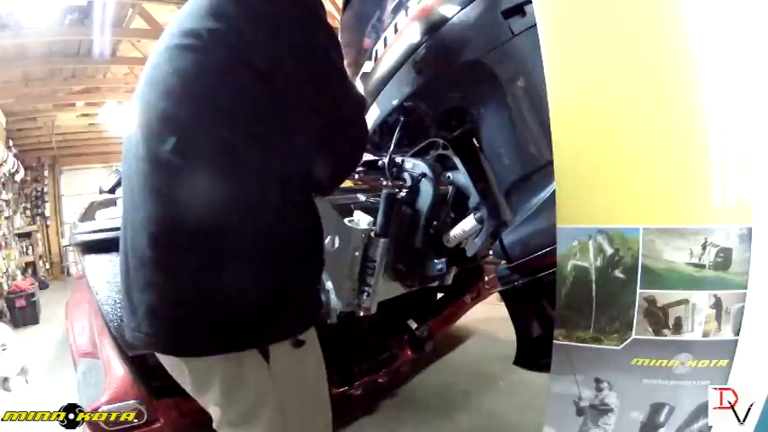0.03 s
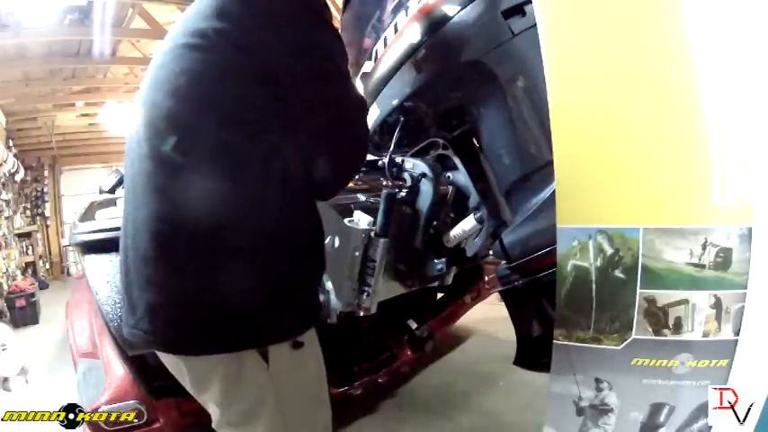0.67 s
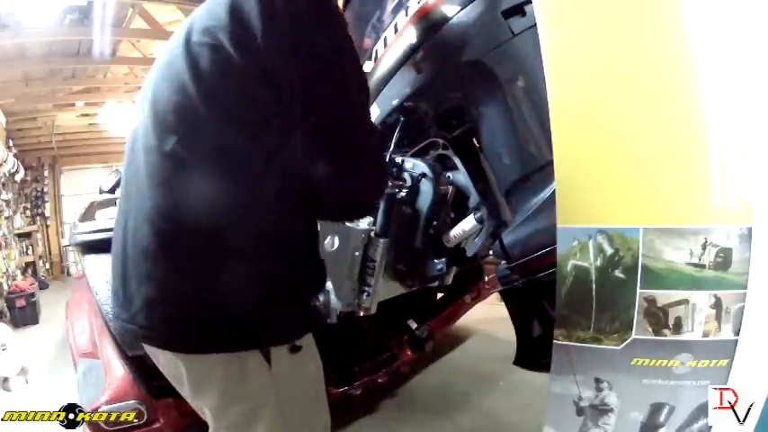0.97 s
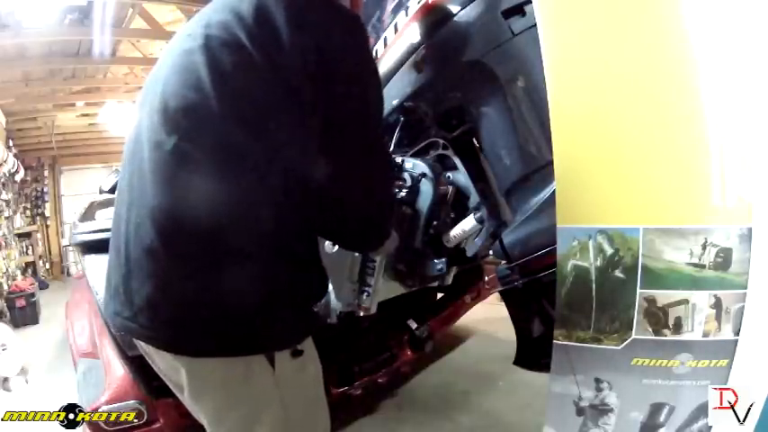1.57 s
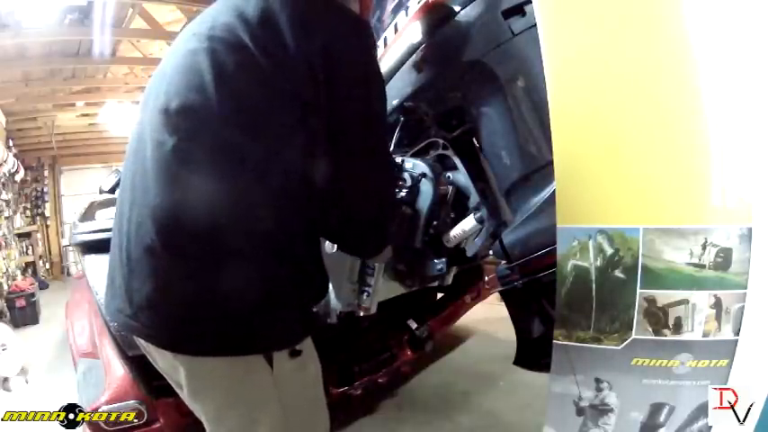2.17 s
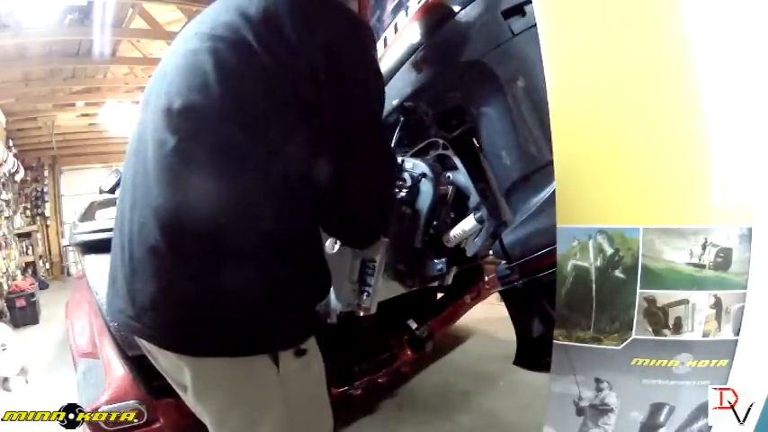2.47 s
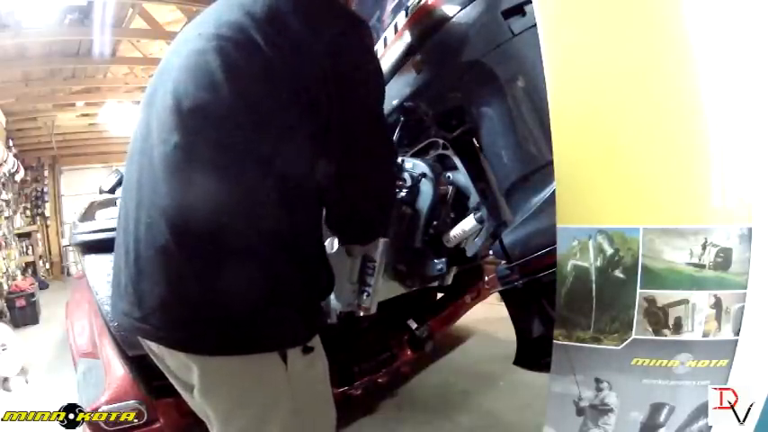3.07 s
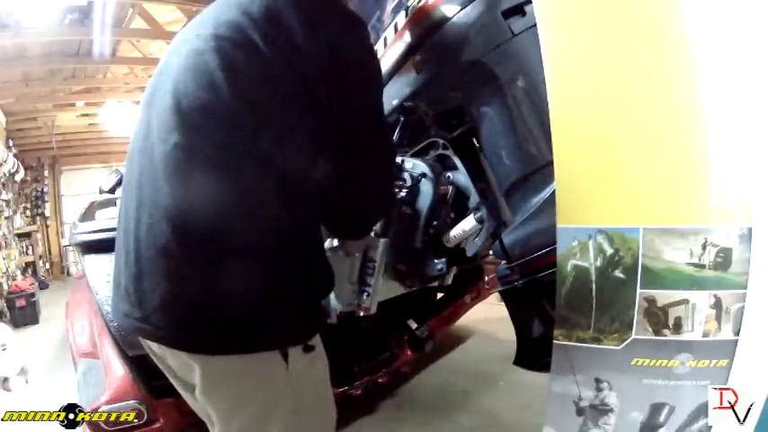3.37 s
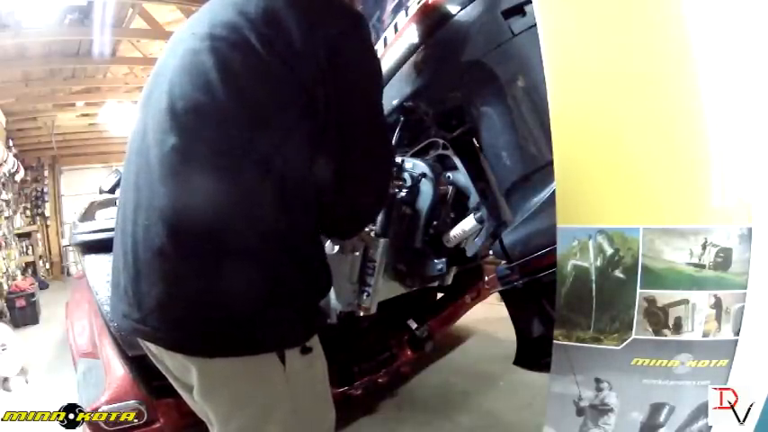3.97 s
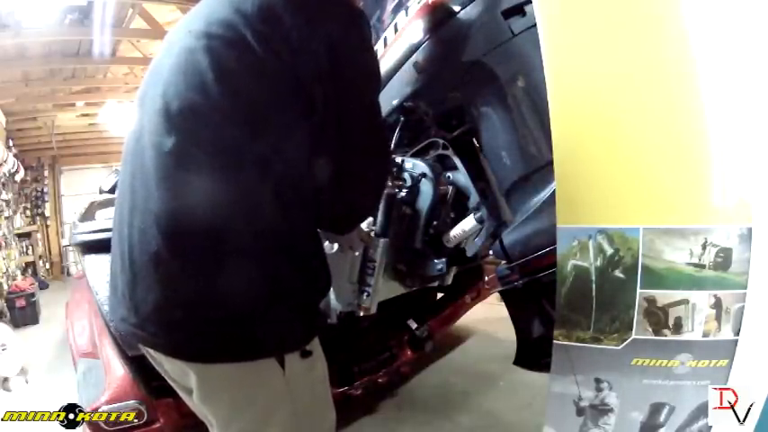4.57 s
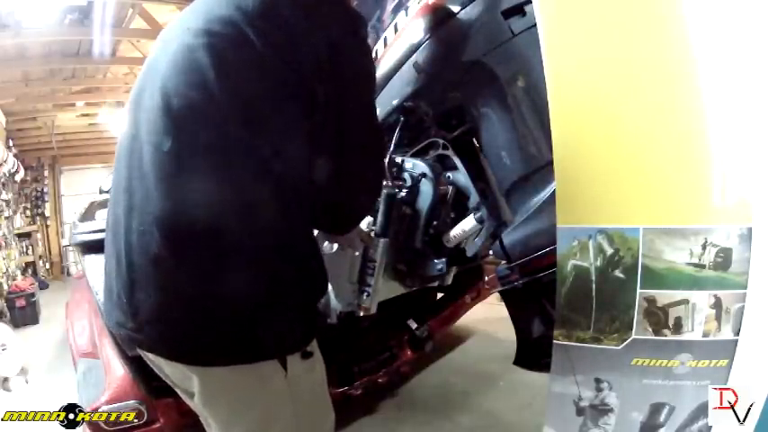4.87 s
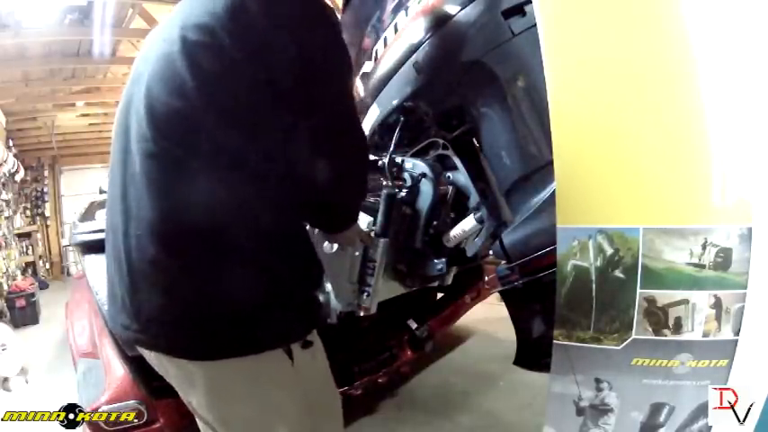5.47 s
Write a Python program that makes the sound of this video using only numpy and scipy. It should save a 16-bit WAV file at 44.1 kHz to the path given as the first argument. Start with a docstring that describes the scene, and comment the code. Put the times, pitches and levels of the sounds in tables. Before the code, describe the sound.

In a quiet garage, a washer rasps faintly along a bolt and a hand bumps a motor housing. Steel bolts then knock, chatter and briefly squeak against a ringing bracket, growing busier before the washer snaps against the bolt head with one bright clang. Several dull bumps follow, and a sleeve rustles near the end. The sounds are fairly close, with a short room echo.

```python
"""Steel hardware is worked into place on a motor bracket in a garage, over quiet room noise.
First a washer rasps along a bolt and hands bump the housing. From 1.3 s bolts knock, chatter
and squeal in stick-slip against the ringing bracket. At 3.1 s the washer snaps against the
bolt head with one bright clang. More dull bumps follow, and a sleeve rustles near the end."""
import sys
import numpy as np
from scipy import signal
from scipy.fft import rfft, irfft
from scipy.io import wavfile
from scipy.ndimage import uniform_filter1d

SR = 44100
rng = np.random.default_rng(int(sys.argv[2]) if len(sys.argv) > 2 else 0)


def transcribe(signal):
    """Save signal, clipped to [-1, 1], as a 16-bit WAV file at the path in sys.argv[1]."""
    frames = np.atleast_2d(signal).T
    limited = np.clip(frames, -1, 1)
    pcm = np.round(limited * 32767).astype(np.int16)
    wavfile.write(sys.argv[1], SR, pcm)


N = 243873

# Bolt-on-bracket contacts. Each row: start in seconds, chatter length in seconds, strength in dB,
# hardness (treble over middle) in dB, grip (favours bolt ring over bracket ring) in dB.
CONTACTS = [(1.2941, 0.0097, -28, 0.5, 6), (1.305, 0.02, -37, -6, 3), (1.479, 0.075, -50, -14, 22),
            (1.558, .051, -47.5, -15, 14), (1.733, 0.037, -51, -34, 41), (1.7616, 0.02, -37, -8, 6.5),
            (1.913, 0.051, -47.5, -8.5, 16), (1.98, 0.008, -32, .5, 6), (2.0031, 0.0049, -31, 8, 14),
            (2.021, .016, -25.5, 0, 2), (2.042, 0.012, -28, 1.5, 17), (2.068, 0.012, -36.5, 2, 5),
            (2.1982, 0.006, -31.5, -3, 7), (2.22, 0.018, -32, 2, -4), (2.244, 0.055, -28, 2.5, 3),
            (2.328, 0.017, -23, -4.5, -1.5), (2.356, 0.0051, -21.5, 3, 9), (2.366, 0.0044, -29.5, 14, 14.5),
            (2.4345, 0.0049, -26, -15.5, 16), (2.588, 0.0079, -32, -1.5, 7.5),
            (2.706, 0.034, -44.5, -16, 8), (2.809, 0.046, -51, -3, 5), (2.922, 0.021, -48.5, 2, 1),
            (2.959, 0.025, -25, -2.5, -6), (2.993, 0.021, -38.5, 17, 0.5), (3.014, 0.002, -36.5, 10, 2.5),
            (3.108, 0.0055, -26, 10, -5.5), (3.13, .002, -41.5, 22.5, -9.5)]
# Split modes of the washer. Each row: frequency in Hz, relative level in dB, t60 in seconds.
WASHER_MODES = [(3680, 0, .22), (3745, -1, .22), (8285, -5, .2), (8350, -6, .2)]


def amp(db):
    """Decibels to gain."""
    return 10 ** (np.asarray(db) / 20)


def unit(x):
    """Scale to energy 1."""
    return x / np.sqrt(np.sum(x ** 2) + 1e-20)


def at_level(x, db):
    """Scale so that the loudest 10 ms has an rms of db."""
    return amp(db) * x / np.sqrt(uniform_filter1d(x ** 2, SR // 100).max() + 1e-20)


def onset(n, rise_s):
    """Exponential rise towards 1, n samples long."""
    return 1 - np.exp(-np.arange(n) / SR / rise_s)


def curve_at(points, hz):
    """Interpolate (Hz, value) points on a log-frequency axis."""
    points_hz, values = np.transpose(points)
    return np.interp(np.log(hz + 1), np.log(points_hz), values)


def add(mix, start_s, sound):
    """Mix a sound in at start_s."""
    part = mix[max(round(start_s * SR), 0):][:len(sound)]
    part += sound[:len(part)]


def colour(x, spectrum):
    """Minimum-phase filter through (Hz, dB) points."""
    size = 2048
    gain = amp(curve_at(spectrum, np.fft.rfftfreq(size, 1 / SR)))
    cepstrum = irfft(np.log(gain))
    cepstrum[1:size // 2] *= 2
    cepstrum[size // 2 + 1:] = 0
    return signal.fftconvolve(x, irfft(np.exp(rfft(cepstrum))))[:len(x)]


def hiss(spectrum):
    """Coloured noise, rms 1."""
    return unit(colour(rng.standard_normal(N), spectrum)) * np.sqrt(N)


def wander(n, smooth_samples):
    """Smoothed noise, rms 1."""
    return unit(uniform_filter1d(rng.standard_normal(n), smooth_samples)) * np.sqrt(n)


def ring(modes):
    """Decaying (Hz, dB, t60 s) modes in random phase, energy 1."""
    out = np.zeros(SR * 3 // 4)
    for hz, db, t60_s in modes:
        t = np.arange(min(int(t60_s * SR), len(out))) / SR
        out[:len(t)] += amp(db - 60 * t / t60_s) * np.sin(2 * np.pi * (hz * t + rng.random()))
    return unit(out)


def struck(pitches_hz, decays, place_db=-0.5, split_hz=14, twin_db=-6):
    """Struck steel: each place of contact favours other modes, and each mode beats with a twin."""
    places, splits = rng.standard_normal((2, len(pitches_hz)))
    modes = [(hz, db + place_db * place, t60_s)
             for hz, (db, t60_s), place in zip(pitches_hz, decays, places)]
    twins = [(hz + split_hz * split, db + twin_db, t60_s)
             for (hz, db, t60_s), split in zip(modes, splits)]
    return ring(modes + twins)


def strokes(rows, attack_share, release_s, slope_db_per_s=0):
    """Gain of rubbing strokes: each swells over a share of its length, runs on, then dies away."""
    out, t = np.zeros(N), np.arange(SR) / SR
    for start_s, length_s, db in rows:
        swell = np.minimum(t / (attack_share * length_s), 1)
        release = np.exp(-np.maximum(t - length_s, 0) / release_s)
        add(out, start_s, amp(db + slope_db_per_s * t) * swell * release)
    return out


def garage(direct_db, near_db, near_s):
    """Room response: direct sound, quick scatter off the machine, and a tail; dB relative to the tail."""
    # Each row: frequency in Hz, reverberation t60 in seconds.
    reverb_times = [(100, 0.98), (400, 0.45), (1000, 0.46), (2800, 0.34), (7300, 0.35), (15000, 0.42)]
    t = np.arange(SR * 3 // 4) / SR
    hz, frame_s, spectra = signal.stft(rng.standard_normal(len(t)), SR, nperseg=256)
    decay = amp(-60 * frame_s / curve_at(reverb_times, hz)[:, None])
    tail = signal.istft(spectra * decay, SR, nperseg=256)[1][:len(t)]
    tail *= onset(len(t), rise_s=0.0016)
    near = rng.standard_normal(len(t)) * np.exp(-t / near_s)
    return unit(amp(direct_db) * (t == 0) + amp(near_db) * unit(near) + unit(tail))


def room_noise(noise_db=-57, whine_db=-73.5):
    """Quiet steady noise with a few faint whines."""
    # Each row: frequency in Hz, relative level in dB.
    noise_spectrum = [(25, -5), (86, -3.5), (156, -7), (240, -1.5), (400, -8.5), (540, -12), (700, -17.5),
                      (1800, -24), (3300, -25), (4200, -24.5), (5400, -27), (6050, -39), (6500, -33),
                      (7900, -28), (10000, -36.5), (15000, -38)]
    # Each row: frequency in Hz, relative level in dB, t60 in seconds.
    whine_modes = [(1370, -3.5, 0.15), (2750, -2, .04), (4136, 0.5, 0.039), (6620, -16, 0.024),
                   (7900, -8.5, .015)]
    whine = signal.fftconvolve(rng.standard_normal(N), ring(whine_modes))[:N]
    return amp(noise_db) * hiss(noise_spectrum) + amp(whine_db) * whine


def sleeve(rustle_db=-4, grain_db=1.6):
    """Fibres catch in tiny grains as the arm speeds up, while the loose cloth flaps."""
    # Each row: start in seconds, length in seconds, relative level in dB.
    brushes = [(4.895, 0.2, -47), (5.395, 0.024, -53)]
    # Each row of both: frequency in Hz, relative level in dB.
    rustle_spectrum = [(500, -9), (1200, -8), (2600, -3), (3400, -5), (4100, -2), (6000, -14), (7900, -7.5),
                       (10500, -21.5), (13200, -29), (14900, -20)]
    flap_spectrum = [(25, -8), (70, 15), (130, -13), (300, -20.5), (700, -45)]
    grains = wander(N, smooth_samples=120)
    rub = strokes(brushes, attack_share=0.16, release_s=0.019, slope_db_per_s=20)
    rustle = rub * hiss(rustle_spectrum) * amp(grain_db * grains + rustle_db)
    # Only the long stroke swings the cloth, most at its start.
    swing = strokes(brushes[:1], attack_share=0.12, release_s=0.091, slope_db_per_s=-38)
    return rustle + swing * hiss(flap_spectrum)


def washer_slides(ring_db=-3, rasp_db=-3):
    """A washer is pushed along a bolt: friction rasps and rings its split modes, which beat."""
    # Each row: start in seconds, length in seconds, relative level in dB.
    slides = [(.415, 0.094, -47.5), (.552, .025, -45)]
    # Each row: frequency in Hz, relative level in dB.
    rasp_spectrum = [(800, -23), (2800, -16), (3700, -3), (4700, -10), (6000, -20.5), (8300, -11),
                     (9800, -36), (15000, -34.5)]
    push = strokes(slides, attack_share=0.35, release_s=0.013)
    tone = signal.fftconvolve(push * rng.standard_normal(N), ring(WASHER_MODES))[:N]
    friction = push * hiss(rasp_spectrum)
    rasp = signal.fftconvolve(friction, garage(direct_db=0, near_db=1, near_s=0.0051))[:N]
    return amp(ring_db) * tone + amp(rasp_db) * rasp


def housing_bumps(trim_db=-5, note_t60_s=0.11, rebound_s=0.03, rebound_db=-9):
    """Padded blows of a hand: a thud, a brief hollow note and the boom of the whole mass."""
    # Each row: start in seconds, relative level in dB, hollow note in Hz.
    bumps = [(1.053, -42, 418), (1.108, -35.5, 517.5), (1.596, -40.5, 450), (2.338, -32.5, 100.6),
             (3.111, -28.5, 250), (3.478, -45.5, 208), (3.586, -40.5, 397), (3.658, -43, 219),
             (3.8, -44.5, 258), (3.827, -37.5, 277.6), (4.605, -26.5, 517), (4.753, -31.5, 531),
             (4.839, -35, 513), (4.882, -27.5, 430), (5.519, -29, 324.5)]
    # Each row of both: frequency in Hz, relative level in dB.
    thud_spectrum = [(40, -14), (150, -6), (300, 3), (550, -4.5), (720, -13.5), (1400, -21.5), (2000, -31),
                     (2600, -27.5), (5000, -33.5), (10500, -40.5), (12300, -21), (14000, -48.5)]
    boom_spectrum = [(25, -22), (65, 2.5), (105, 9), (150, -7), (230, 5), (400, -10.5), (1000, -37)]
    out = np.zeros(N)
    for start_s, db, note_hz in bumps:
        boom_db = -6 - 12 * np.log2(note_hz / 310)  # the lower the note, the more the mass moves
        for delay_s, softer_db in (0, 0), (rebound_s, rebound_db):  # the hand settles once
            room = garage(direct_db=-9, near_db=-0.5, near_s=0.017)
            thud = unit(colour(room, thud_spectrum))
            note = unit(colour(ring([(note_hz, 0, note_t60_s)]), thud_spectrum))
            boom = amp(boom_db) * unit(colour(room, boom_spectrum))
            sound = (thud + note + boom) * onset(len(room), rise_s=0.0014)
            add(out, start_s + delay_s, at_level(sound, db + trim_db + softer_db))
    return out


def squeals(waver_share=0.0034):
    """Steel sticks and slips, locking on to one resonance in a short wavering tone."""
    # Each row: start in seconds, length in seconds, pitch in Hz, level in dB, glide as a share of pitch.
    tones = [(1.303, 0.028, 4740, -33.5, 0), (1.304, 0.023, 7240, -37, 0), (1.549, 0.057, 2560, -52.5, 0),
             (1.757, 0.1, 4020, -51.5, 0.014), (1.922, 0.027, 4190, -52.5, 0),
             (2.291, 0.04, 2580, -29.5, 0.027), (2.32, 0.042, 2030, -33.5, -0.33),
             (2.358, 0.012, 4210, -30.5, 0), (2.927, 0.018, 4870, -48.5, 0),
             (3.073, 0.039, 1600, -42.5, 0.14)]
    out = np.zeros(N)
    for start_s, length_s, hz, db, glide in tones:
        n = int(length_s * SR)
        drift = wander(SR, smooth_samples=90)[:n]
        pitch_hz = hz * (1 + waver_share * drift + glide * np.linspace(-0.5, 0.5, n))
        tone = np.sin(2 * np.pi * np.cumsum(pitch_hz) / SR) * signal.windows.tukey(n, 0.5)
        sound = signal.fftconvolve(tone, garage(direct_db=29, near_db=-8, near_s=0.0067))
        add(out, start_s, at_level(sound, db))
    return out


def washer_snaps(washer_db=-12):
    """The loose washer snaps against the bolt head, which pings and chokes; the washer rings on."""
    # Each row: start in seconds, level in dB.
    snaps = [(1.762, -67), (3.018, -32.5), (3.1093, -14)]
    # Each row: frequency in Hz, relative level in dB, t60 in seconds.
    head_modes = [(3950, -1, 0.056), (4113, -2, .05), (6110, 2, 0.0392), (6600, 1, 0.035),
                  (7800, -5.5, 0.13)]
    out = np.zeros(N)
    for start_s, db in snaps:
        ping = ring(head_modes) + amp(washer_db) * ring(WASHER_MODES)
        sound = signal.fftconvolve(ping, garage(direct_db=1, near_db=0.5, near_s=0.0019))
        sound *= onset(len(sound), rise_s=0.0008)
        add(out, start_s, at_level(sound, db))
    return out


def first_blow_db(length_s, fall_db_per_s=257):
    """First blow over the chatter after it: a short knock starts sharply, a long drag creeps in."""
    return 2.5 - fall_db_per_s * length_s


def casting_clunks(trim_db=-4):
    """The first blow of each contact clunks in the heavy casting; the sharper, the louder."""
    # Each row: frequency in Hz, relative level in dB, t60 in seconds.
    casting_modes = [(450, -4.5, 0.085), (922, -5.5, 0.041), (1110, 4.5, 0.033), (1567, -12, 0.053)]
    out = np.zeros(N)
    for start_s, length_s, strength_db, _, _ in CONTACTS:
        clunk = signal.fftconvolve(ring(casting_modes), garage(direct_db=10.5, near_db=-9, near_s=0.004))
        clunk *= onset(len(clunk), rise_s=0.0006)
        add(out, start_s, at_level(clunk, strength_db + trim_db + first_blow_db(length_s)))
    return out


def chatter(length_s, count=80, gap_s=0.001, spread_db=2.5):
    """A first blow, then small irregular slips as the threads drag over an edge."""
    slip_s = (np.arange(count) + rng.random(count)) * gap_s
    kicks = rng.choice([-1, 1], count) * amp(spread_db * rng.standard_normal(count))
    gate = np.clip((length_s - slip_s) / gap_s + 1, 0, 1)
    slips = np.zeros(SR // 10)
    slips[(slip_s * SR).astype(int)] = kicks * gate
    slips = unit(slips)
    slips[0] += amp(first_blow_db(length_s))
    return slips


def registers_db(strength_db, hardness_db, usual_db=-30):
    """Bass, middle, treble, top: all grow with strength; hardness lifts the treble and thins the bass."""
    force_db = strength_db - usual_db
    bass_db = -32 + 0.84 * force_db - 0.25 * hardness_db
    top_db = -40.5 + 0.93 * force_db
    return bass_db, strength_db, strength_db + hardness_db, top_db


def bolt_contacts(bolt_db=-1, trim_db=-2.5, damping_db_per_s=45):
    """Each contact cracks and rings both the steel bracket and the finger-damped bolt."""
    # Each row: frequency in Hz, relative level in dB.
    crack_spectrum = [(40, -19), (170, -6), (300, 4), (400, 5.5), (520, 5.5), (680, -11), (820, -2),
                      (1150, 6), (1850, 1), (2750, 6), (3500, -6), (6500, -4), (9200, -12.5), (10200, -14),
                      (13000, -14.5), (14800, -16.5)]
    # Mode frequencies.
    bracket_hz = [394, 941, 1125, 1223, 1540, 2293, 2488, 2619, 2855, 3655, 3768, 4017, 4182, 4317, 4694,
                  4818, 5105, 5353, 5738, 6262, 6645, 6895, 7182, 7983, 9146, 9512, 9705, 14300, 14489,
                  14850]
    bolt_hz = [520, 937, 1250, 1552, 2640, 2800, 3100, 4140, 4780, 5770, 6228, 7220, 7850, 9380, 10450,
               13540, 14650]
    # Each row, one per mode: relative level in dB, t60 in seconds.
    bracket_decays = [(-2.5, 0.61), (-22.5, 0.26), (-12.5, 0.21), (2, 0.28), (7, 0.11), (1, 0.45),
                      (0, 0.66), (-7.5, 0.24), (-11.5, 0.25), (-13, 0.54), (-9, 0.2), (-7.5, 0.33),
                      (-7, .22), (-7, 0.22), (-13, 0.11), (-3, 0.15), (-8.5, 0.37), (-9, 0.3), (-5, 0.15),
                      (-12.5, 0.34), (-14, 0.25), (-13, 0.43), (-7, 0.16), (-5.5, 0.19), (-20.5, 0.27),
                      (-11.5, 0.38), (-11.5, .34), (-15.5, .32), (-6.5, .45), (-15, .28)]
    bolt_decays = [(-7, 0.12), (1.5, 0.063), (2.5, 0.078), (4, 0.14), (0.5, 0.079), (-15, 0.016),
                   (4, 0.014), (8.5, 0.043), (1.5, 0.04), (-4.5, 0.038), (-11, 0.026), (-6, .05),
                   (-2, 0.06), (-8, .05), (-13, 0.067), (-15, 0.059), (-11.5, 0.071)]
    # Borders between bass, middle, treble and top.
    crossovers_hz = [700, 3400, 8700]
    edges_hz = [20, *crossovers_hz, 18000]
    bands = [signal.butter(4, pair, "band", fs=SR, output="sos") for pair in zip(edges_hz, edges_hz[1:])]
    out = np.zeros(N)
    for start_s, length_s, strength_db, hardness_db, grip_db in CONTACTS:
        slips = chatter(length_s)
        crack = unit(colour(garage(direct_db=-14, near_db=2, near_s=0.014), crack_spectrum))
        n = len(crack)
        t = np.arange(n) / SR
        rise = onset(n, rise_s=0.0023)  # vibration takes a moment to spread through the steel
        bolt = struck(bolt_hz, bolt_decays)
        bolt = signal.fftconvolve(bolt, garage(direct_db=10.5, near_db=-5.5, near_s=0.0021))[:n]
        bolt = amp(bolt_db + grip_db / 2) * unit(bolt)
        clatter = signal.fftconvolve(slips, rise * (crack + bolt))[:n]
        # The bracket gathers the energy of the slips; a firm grip damps it.
        gathered = np.sqrt(np.cumsum(np.pad(slips, (0, n - len(slips))) ** 2))
        damping = amp(-grip_db / 2 - damping_db_per_s * amp(grip_db) * t)
        bracket = damping * gathered * rise * struck(bracket_hz, bracket_decays)
        for band, db in zip(bands, registers_db(strength_db, hardness_db)):
            add(out, start_s, at_level(signal.sosfilt(band, clatter + bracket), db + trim_db))
    return out


def scene(side_db=-72):
    """Stereo mix: both channels alike, except for a faint low-weighted noise that differs between them."""
    # Each row: frequency in Hz, relative level in dB.
    side_spectrum = [(25, 7), (100, -14.5), (400, -17.5), (1500, -28), (4000, -27.5), (9000, -42.5)]
    steel = bolt_contacts() + casting_clunks() + washer_snaps() + squeals()
    mid = steel + housing_bumps() + washer_slides() + sleeve() + room_noise()
    side = amp(side_db) * hiss(side_spectrum)
    return np.array([mid + side, mid - side])


def record(dry, notch_hz=12000, cutoff_hz=15270):
    """Narrow treble notch, then a steep low-pass."""
    notched = signal.lfilter(*signal.iirnotch(notch_hz, Q=22, fs=SR), dry)
    lowpass = signal.firwin(801, cutoff_hz, window=("kaiser", 8), fs=SR)
    return signal.oaconvolve(notched, lowpass[None], "same")


dry = scene()
out = record(dry)
transcribe(out)
```